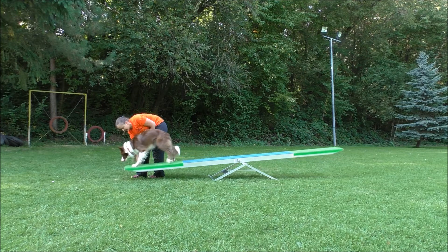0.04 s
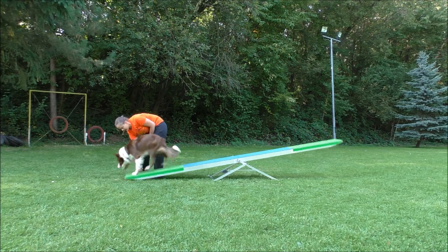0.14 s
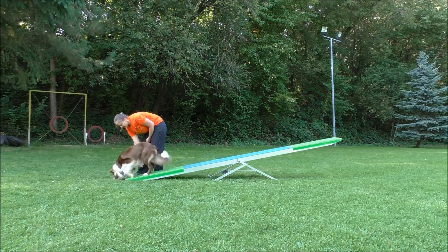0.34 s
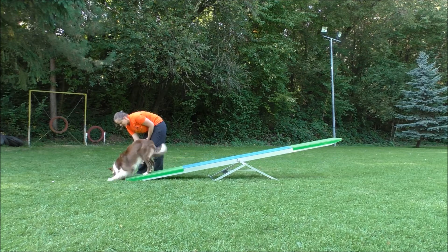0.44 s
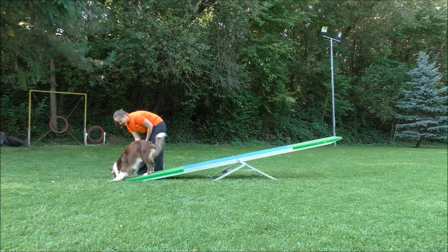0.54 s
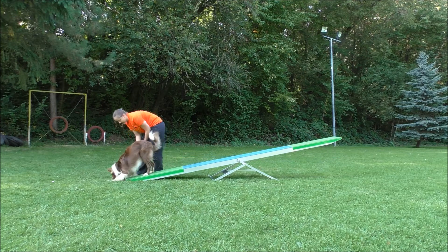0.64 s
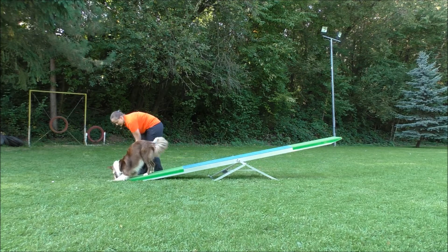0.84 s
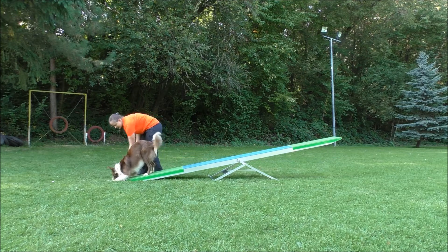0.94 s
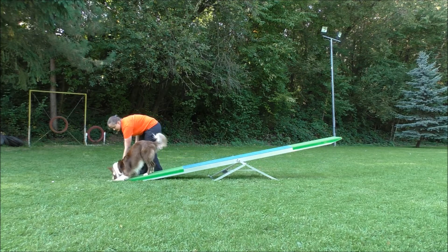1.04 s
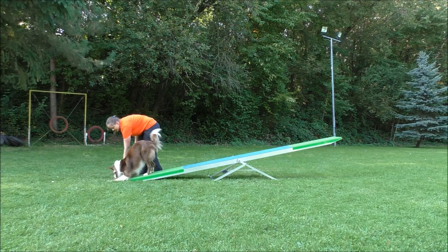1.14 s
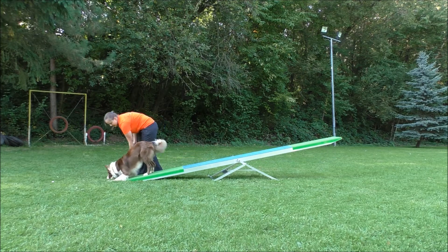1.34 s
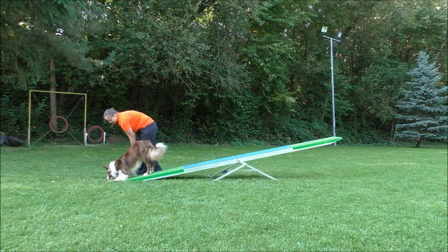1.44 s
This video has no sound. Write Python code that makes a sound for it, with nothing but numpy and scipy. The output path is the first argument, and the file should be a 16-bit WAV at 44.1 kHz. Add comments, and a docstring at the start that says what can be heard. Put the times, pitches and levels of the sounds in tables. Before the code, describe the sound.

A wooden seesaw strikes the lawn at about 0.2 seconds with a hollow thud, some metres away. The plank immediately clatters on its metal pivot in quick, ringing knocks that weaken by 0.5 seconds, with one small rebound near 0.6 seconds. A soft echo from the trees dies away by around one second. Faint distant traffic, low rumble and leaf hiss continue throughout, until about 1.5 seconds.

```python
"""A thud and a clatter sound over faint traffic: a wooden seesaw tips over on a lawn some metres away.
Its end strikes the turf and the plank rings in its bending modes; the board then knocks on its metal
pivot frame, exciting the frame's resonances ever more weakly, and rebounds once more. The tree line
scatters back a soft tail. Tyre roar, a low rumble, a far engine and leaf hiss fill the air."""
import sys
import numpy as np
from scipy import signal
from scipy.fft import rfft, irfft, next_fast_len
from scipy.io import wavfile
from scipy.ndimage import uniform_filter1d, map_coordinates

SR = 44100
rng = np.random.default_rng(int(sys.argv[2]) if len(sys.argv) > 2 else 0)


def materialize(psi):
    """Save the field psi as 16-bit PCM at rate SR to the path in sys.argv[1].

    A 1-D psi becomes a single channel; in a 2-D psi each row is a channel.
    """
    bounded = np.clip(np.atleast_2d(psi).T, -1, 1)
    quanta = np.round(bounded * 32767).astype(np.int16)
    wavfile.write(sys.argv[1], SR, quanta)


N = 66150

# Impacts at the pivot: t/s, peak level/dB, chatter length/s, tilt/(dB/octave), low ring/dB, crack/dB
PIVOT_KNOCKS = [(0.2355, -11.5, 0.0019, 0.5, -5, 18), (.2395, -12, 0.0085, -5, -12, 9.5),
                (0.2443, -11.5, 0.0029, -3.5, 2, 9.5), (0.2546, -14, 0.01, 3.5, -12, -13),
                (0.2606, -11, 0.0067, -0.5, -2, 17), (.2652, -11.5, .006, -4, -12, 3),
                (0.2738, -16.5, 0.0037, 1.5, -9, -8), (.284, -16, 0.0057, -2, 2, 19),
                (0.2897, -11, 0.008, 0, -5, 9), (0.3026, -15.5, 0.0067, -1, 2, -4),
                (0.326, -22, 0.012, 5.5, 23, 1), (0.3435, -21, 0.0032, -6.5, 18, 6),
                (0.3646, -19, 0.015, -0.5, 16, 12.5), (0.3718, -20.5, 0.0046, 2.5, 9, 9),
                (0.3922, -19, .012, 0.5, 11.5, 0.5), (0.4835, -28, 0.011, 1.5, 0, 1),
                (.4905, -29, .012, 2, 5, 4), (.5725, -35, .006, -3, -6, 4),
                (0.6208, -23.5, .015, 0, 13, -2)]


def plank_thud():
    """Impact excitation: one low push into the turf, while contact forces ring the bending modes."""
    plank_modes = [(134, 34, -7), (220.6, 20.7, -2.5), (300, 22, -1), (417, 59, -8.5), (626, 96, -9),
                   (955, 50, -7), (1051, 53, -7), (1238, 20, -2.5)]  # f/Hz, bandwidth/Hz, level/dB
    touchdown_s, push_hz, push_cycles = .2281, 194, 1.55
    slap_t60, shake_t60 = .069, .76
    t = np.clip(np.arange(N) / SR - touchdown_s, 0, None)
    progress = np.clip(t * push_hz / push_cycles, 0, 1)
    pulse = np.sin(np.pi * progress) ** .87 * (progress < 1)
    push = -amp(-18) * pulse * np.sin(2 * np.pi * push_hz * t)
    onset = 1 - np.exp(-(t / .027) ** 4)
    slap_and_shake = amp(-60 * t / slap_t60) + amp(-9 - 60 * t / shake_t60)
    force = slap_and_shake * onset * rng.standard_normal(N)
    force[round((touchdown_s + .009) * SR)] += amp(21.5)  # one blow starts the ringing
    for start_s, peak_db, *_ in PIVOT_KNOCKS:  # each knock jolts the plank too
        force[round(start_s * SR)] += amp(peak_db + 28) * rng.choice([-1, 1])
    return push + filtered(force, lambda f: resonances(plank_modes)(f) * highpass(f, 100) ** 2)


def pivot_knocks():
    """Repeated impact: each contact drives the frame with a crack and a short burst of chatter."""
    crack_t60, noise_t60, release_s, swell_s = .0076, .062, .004, .0024
    out = np.zeros(N + SR)
    t = np.arange(SR // 10) / SR
    for start_s, peak_db, chatter_s, tilt_db, low_db, crack_db in PIVOT_KNOCKS:
        hold = np.exp(-(np.clip(t - chatter_s, 0, None) / release_s) ** 2)
        crack = amp(crack_db - 60 * t / crack_t60)
        chatter = contact_noise(len(t))
        blow = amp(crack_db + 15) * (t == 0)
        force = chatter * (hold + 2 * crack) + blow
        swelling_force = chatter * hold * (1 - np.exp(-t / swell_s))
        noise_envelope = hold * amp(-60 * t / noise_t60) + crack
        knock = metal_frame(force, swelling_force, noise_envelope, tilt_db, low_db)
        out[round(start_s * SR):][:len(t)] += amp(peak_db) * knock / np.abs(knock).max()
    return out[:N]


def rattle():
    """Contact chatter: loose parts buzz on the frame, fading, and drop 6 dB as the board settles."""
    start_s, settle_s, t60 = .236, .41, .57
    t = np.arange(N) / SR
    decay_db = -20 - 60 * (t - start_s) / t60
    settle_db = -6 / (1 + np.exp(-(t - settle_s) / .006))
    envelope = amp(decay_db + 2.8 * wobble(50.6) + settle_db) * (t > start_s)
    buzz = contact_noise(N) * envelope
    return metal_frame(buzz, buzz, envelope, tilt_db=3, low_db=-2)


def metal_frame(force, low_force, noise_envelope, tilt_db, low_db):
    """Forced vibration: the frame's modes, slightly shifted by each contact, ring over unpitched noise."""
    frame_modes = [(1704, 75, -1), (1850, 170, -10), (2370, 26, -25), (2550, 150, 2), (2766, 173, 1),
                   (3024, 240, -3.5), (3745, 87, -4), (3950, 130, -4.5), (4333, 210, -5.5), (4860, 187, -9),
                   (5720, 154, -12), (6540, 120, -15), (8100, 150, -26), (10370, 580, -20.5)]  # f/Hz, bandwidth/Hz, level/dB
    noise_spectrum = [(590, -31), (1000, -7), (2360, 1), (2590, -2), (5250, -10), (10200, -17),
                      (14600, -25.5), (16000, -35)]  # unpitched part of a contact: f/Hz, spectral level/dB
    modes = [(hz * (1 + .0091 * rng.normal()), width, db + rng.normal(0, 1.3))
             for hz, width, db in frame_modes]
    tilt = lambda f: amp(tilt_db * np.log2(np.clip(f, 1000, None) / 2500))
    high_ring = filtered(force, lambda f: tilt(f) * resonances(modes[2:])(f))
    low_ring = amp(low_db) * filtered(low_force, resonances(modes[:2]))
    noise = filtered(contact_noise(len(force)), lambda f: tilt(f) * amp(along(noise_spectrum, f) - 1.5))
    return high_ring + low_ring + noise * noise_envelope


def contact_noise(count):
    """Superposition: many small contacts of uneven size add up to spiky noise."""
    noise = rng.standard_normal(count)
    size_db = 6 * uniform_filter1d(rng.standard_normal(count), size=16)
    return unit(noise * amp(size_db))


def stereo_width(sound, t60=.033):
    """Decorrelation: a faint, brief, diffuse side signal widens the thud and clatter a little."""
    side_spectrum = [(100, -11), (1000, -25), (3000, -21.5), (8000, -35), (15000, -40)]  # f/Hz, side level re mid/dB
    t = np.arange(SR // 20) / SR
    burst = rng.standard_normal(len(t)) * amp(-60 * t / t60)
    diffuse = signal.fftconvolve(sound, burst / np.linalg.norm(burst))[:N]
    return filtered(diffuse, lambda f: amp(along(side_spectrum, f)))


def tree_echoes(sound, delay_s=.03):
    """Diffuse reverberation: the tree line returns echoes in which each frequency has its own decay."""
    decay_times = [(150, 1.02), (1000, 0.58), (4000, 0.96), (12000, 0.58)]  # f/Hz, T60/s
    side_spectrum = [(150, -17), (1000, -26), (4000, -8), (12000, -40)]  # f/Hz, side level re mid/dB
    f, t, noise = signal.stft(rng.standard_normal((2, SR)), SR, nperseg=256)
    decay_db = -60 * t / along(decay_times, f)[:, None]
    mid_side_db = np.array([0 * f, along(side_spectrum, f)])[..., None]
    mid, side = signal.istft(noise * amp(decay_db + mid_side_db), SR, nperseg=256)[1]
    tail = np.array([mid + side, mid - side]) / np.linalg.norm(mid)
    delayed = np.pad(sound, (round(delay_s * SR), 0))
    return signal.fftconvolve(delayed[None], tail, axes=1)[:, :N]


def traffic():
    """Rolling noise: distant tyres give a broadband roar whose level wavers."""
    tyre_levels = [
        [(0.0, -41), (0.27, -42), (0.58, -47.5), (0.844, -46.5), (1.5, -42.5)],
    ]  # t/s, level/dB
    tyre_spectrum = [(210, -15.5), (350, -13), (605, -15.5), (731, -13.5), (814, -11.5), (1140, 0.5),
                     (1230, -4), (1570, -3), (2740, -11.5), (3470, -14.5), (6000, -28.5), (7800, -32),
                     (13200, -120)]  # f/Hz, spectral level/dB
    waver = amp(2 + .35 * wobble(9) + .38 * wobble(24.15))
    return level(tyre_levels) * waver * diffuse_noise(tyre_spectrum + [(9000, -65)], patchy_db=1.5)


def rumble():
    """Low-frequency noise: random modulation makes it swell unevenly."""
    levels = [(0, -47.5), (.5, -57), (1, -50.5), (1.5, -51.5)]  # t/s, level/dB
    spectrum = [(15, -54), (25, -45), (34, -10), (70, -2.5), (86, 4.5), (102, -10), (134, -1), (205, -7.5),
                (500, -13.5), (650, -38), (1100, -120)]  # f/Hz, spectral level/dB
    return level(levels) * diffuse_noise(spectrum + [(800, -50)], patchy_db=3.9)


def far_engine():
    """Amplitude and frequency modulation: a low drone wavers, slightly louder in one channel than the other."""
    envelope = amp(-56 + 2.5 * wobble(8.07))
    pitch_hz = 79 + 4.1 * wobble(12.4)
    return envelope * np.sin(2 * np.pi * np.cumsum(pitch_hz) / SR) * amp([[.8], [-.8]])


def leaves():
    """Broadband noise: foliage hisses in the treble and eases slightly."""
    levels = [(0, -58.5), (.25, -58.5), (.6, -63), (1.5, -63.5)]  # t/s, level/dB
    spectrum = [(2350, -40), (4000, -25), (5070, -5.5), (8450, -6.5), (15200, -4), (16000, -27)]  # f/Hz, spectral level/dB
    return level(levels) * diffuse_noise([(2500, -42)] + spectrum, patchy_db=.9)


def high_hiss():
    """Band-limited noise: a thin, high hiss swells and passes."""
    levels = [(.62, -96), (.72, -62.5), (.8, -55), (.9, -58), (1.02, -61), (1.1, -80)]  # t/s, level/dB
    spectrum = [(7500, -13), (8600, -7.5), (10500, -8), (12500, -7), (14000, -17)]  # f/Hz, spectral level/dB
    return level(levels) * diffuse_noise([(6000, -58)] + spectrum + [(15500, -60)], patchy_db=.7)


def diffuse_noise(spectrum, patchy_db):
    """Partial coherence: stereo noise of rms 1, with random gain patches in time and frequency."""
    width = [(60, -16), (150, -7), (380, -6), (950, -7), (2380, -5), (5980, -16), (15000, -60)]  # f/Hz, side level re mid/dB
    balance = [(60, 3.5), (240, 0.0), (950, -4), (3770, -2.5), (15000, 1.5)]  # f/Hz, left level re right/dB
    noise = signal.stft(rng.standard_normal((2, N)), nperseg=512)[2]
    patches = uniform_filter1d(rng.standard_normal(noise.shape[1:]), size=5, axis=0)
    patches = uniform_filter1d(patches, size=12, axis=1)
    pair = signal.istft(noise * amp(patchy_db * unit(patches)), nperseg=512)[1][:, :N]
    mid, side = filtered(pair, lambda f: amp(along(spectrum, f) + [0 * f, along(width, f)]))
    stereo = np.array([mid + side, mid - side])
    return unit(filtered(stereo, lambda f: amp([along(balance, f) / 2, -along(balance, f) / 2])))


def resonances(modes):
    """Modal superposition: the causal response of damped resonators of alternating sign."""
    return lambda f: sum((-1) ** k * amp(db) * 1j * f * width / (hz * hz - f * f + 1j * f * width)
                         for k, (hz, width, db) in enumerate(modes))


def highpass(f, corner_hz):
    """First-order high-pass response."""
    return 1j * f / (corner_hz + 1j * f)


def filtered(x, response):
    """Linear filtering: the spectrum of x times a complex frequency response."""
    size = next_fast_len(x.shape[-1] + SR // 4)
    return irfft(rfft(x, size) * response(np.fft.rfftfreq(size, 1 / SR)), size)[..., :x.shape[-1]]


def amp(db):
    """Amplitude ratio of a level in dB."""
    return 10 ** (np.asarray(db) / 20)


def unit(x):
    """Normalisation to rms 1."""
    return x / np.sqrt(np.mean(x ** 2) + 1e-20)


def along(points, hz):
    """Interpolation of (f/Hz, value) points on a logarithmic frequency axis."""
    f, values = np.transpose(points)
    return np.interp(np.log(hz + 1), np.log(f + 1), values)


def level(rows):
    """Amplitude envelope from (t/s, level/dB) rows."""
    times, db = np.transpose(np.reshape(rows, (-1, 2)))
    return amp(np.interp(np.arange(N) / SR, times, db))


def wobble(rate):
    """Smooth random modulation, with rate knots a second."""
    return map_coordinates(rng.standard_normal(N // 100), [np.arange(N) * rate / SR])


def scene():
    """Superposition: the centred, slightly widened seesaw, the tree echoes and the background add."""
    seesaw = plank_thud() + pivot_knocks() + rattle()
    side = stereo_width(seesaw)
    echoes = amp(-11) * tree_echoes(seesaw)
    background = traffic() + rumble() + far_engine() + leaves() + high_hiss()
    return np.array([seesaw + side, seesaw - side]) + echoes + background


def record(dry):
    """Band limiting: the microphone rolls off the deepest bass and passes nothing above 16 kHz."""
    return filtered(dry, lambda f: (f < 16000) * highpass(f, 32))


dry = scene()
out = record(dry)
materialize(out)
```